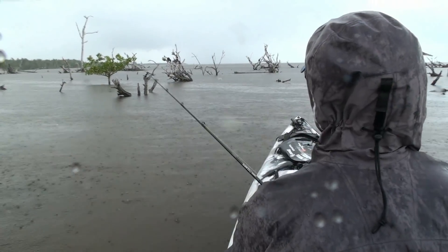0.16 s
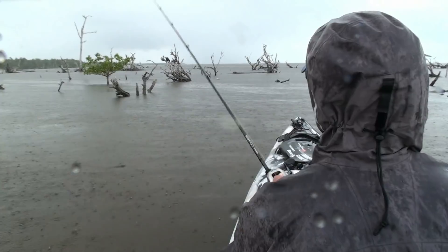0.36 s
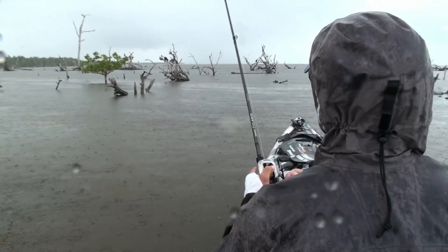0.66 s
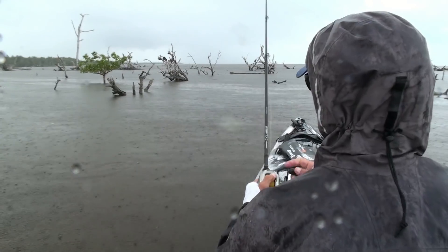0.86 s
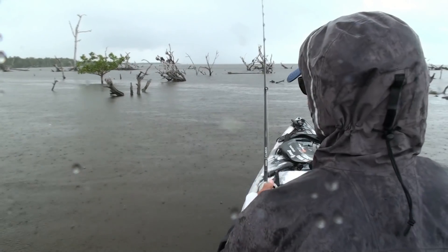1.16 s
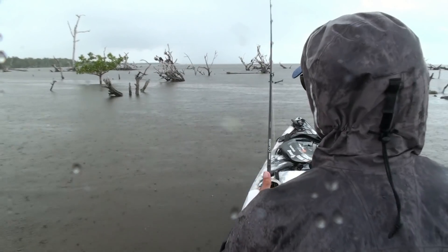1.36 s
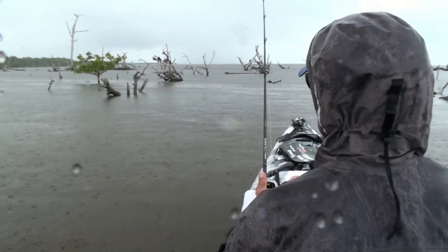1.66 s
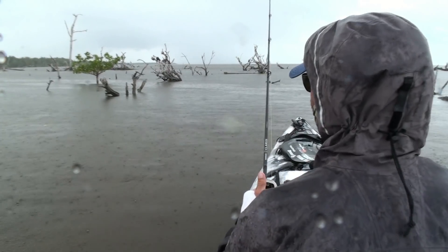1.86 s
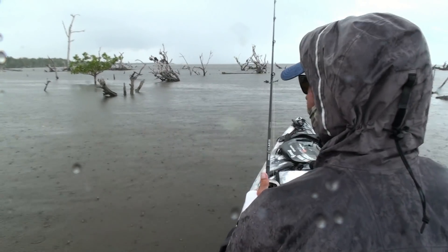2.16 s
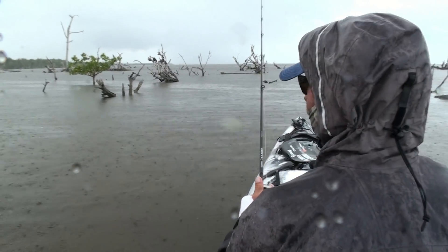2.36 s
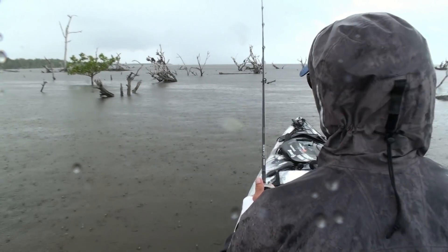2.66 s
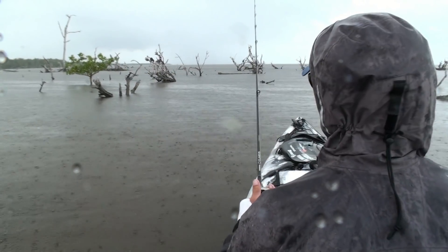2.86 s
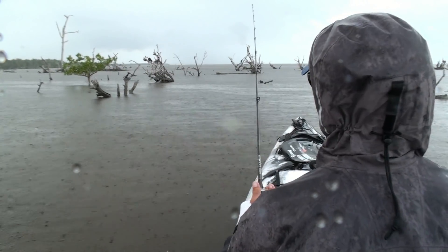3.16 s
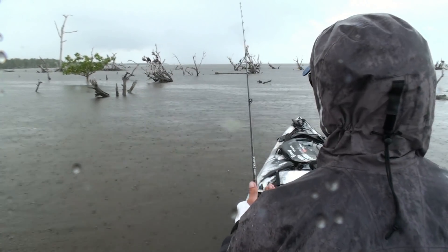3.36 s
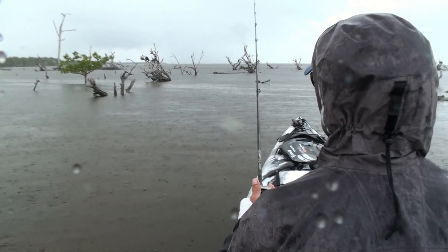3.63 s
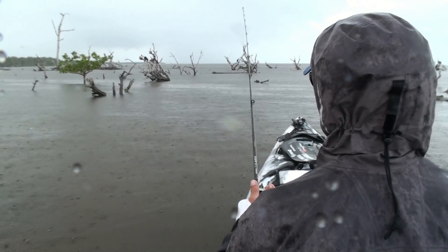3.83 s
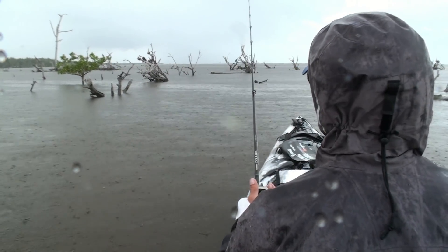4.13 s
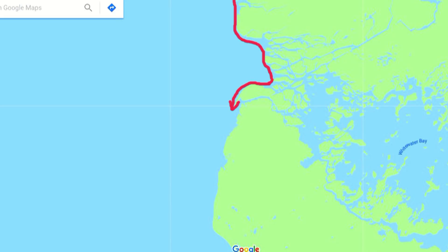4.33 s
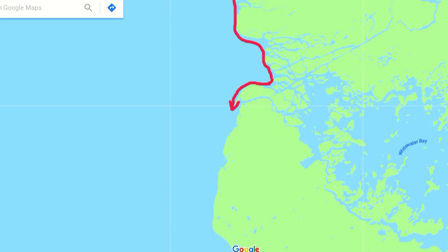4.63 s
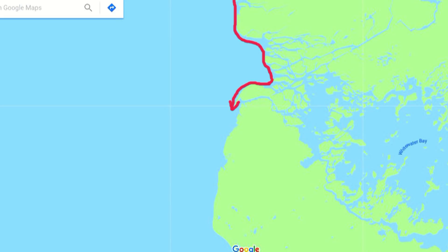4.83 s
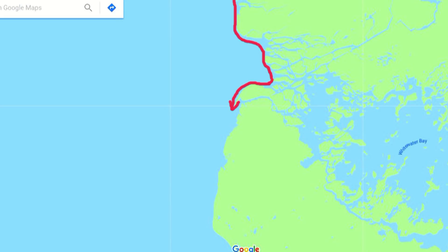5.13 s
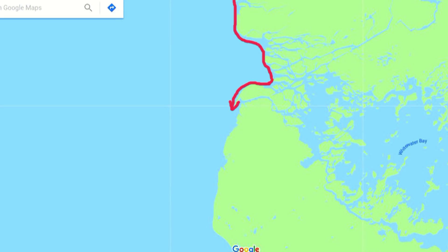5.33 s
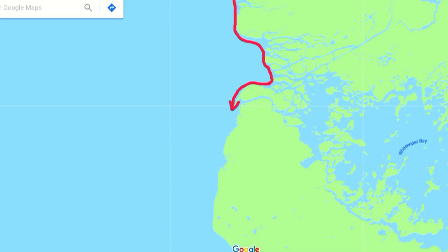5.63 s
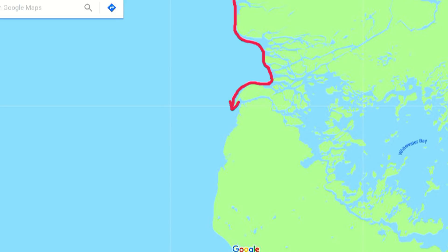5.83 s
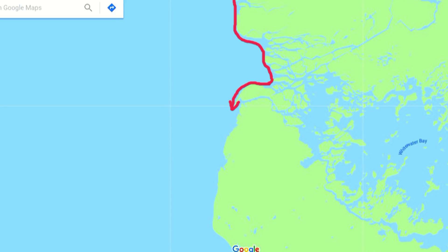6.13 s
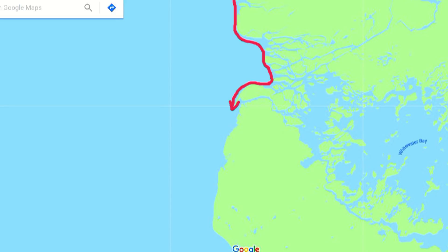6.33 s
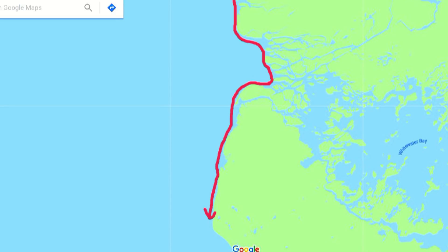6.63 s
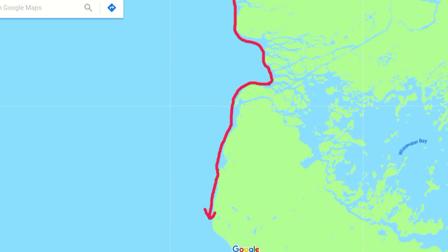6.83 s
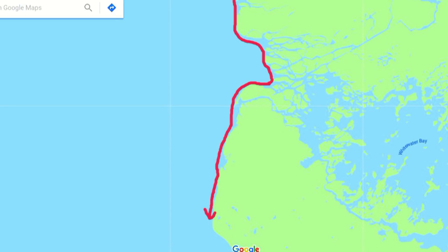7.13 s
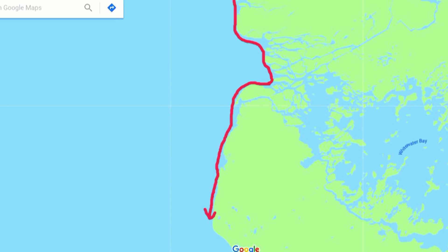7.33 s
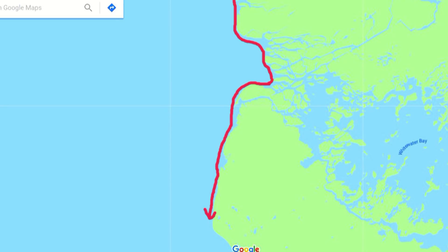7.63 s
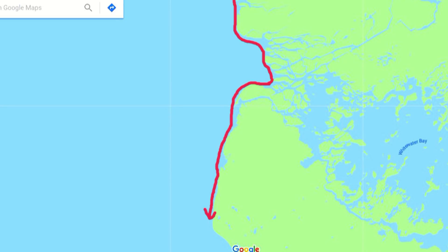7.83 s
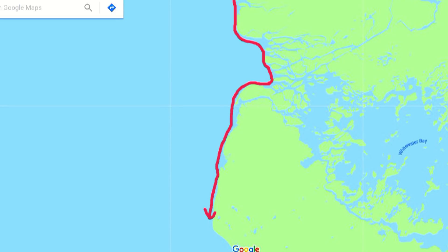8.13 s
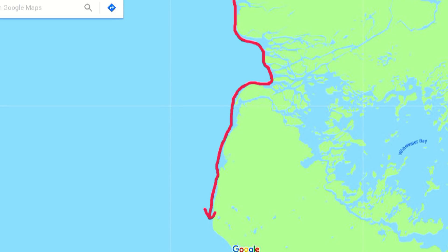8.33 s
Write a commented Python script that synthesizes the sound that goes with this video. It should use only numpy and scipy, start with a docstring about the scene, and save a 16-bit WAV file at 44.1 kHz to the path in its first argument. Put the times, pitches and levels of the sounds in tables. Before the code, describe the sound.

Steady rain hisses on open water while drops slap a waterproof hood close by; halfway through, low wind rumbles and flutters across the microphone.

```python
"""A hiss of far rain and wet slaps of near drops open the scene: rain on open water under a waterproof cover.
Near drops are noise slaps over the cover's short decaying modes; the hiss is grainy filtered noise.
Plops are rising, dying tones, hull knocks are longer modes, and a few drops spit bright noise.
Halfway, wind sets in: coloured noise swelled by gusts rumbles and flutters at two microphone ports,
and wavering tones hum over their edges."""
import sys
import numpy as np
from scipy import signal
from scipy.fft import rfft, irfft, next_fast_len
from scipy.io import wavfile
from scipy.ndimage import map_coordinates

SR = 44100
rng = np.random.default_rng(int(sys.argv[2]) if len(sys.argv) > 2 else 0)


def invert_db(x):
    """Field ratio 10**(x/20) for x, a level in decibels (scalar or array-like)."""
    u = np.asarray(x, float) / 20
    return 10 ** u


def put_to_file(sound):
    """Save the sound as 16-bit audio at rate SR, in the file named by the first command-line argument."""
    columns = np.atleast_2d(sound).T  # one column per channel
    safe = np.clip(columns, -1, 1)
    whole_steps = np.round(safe * 32767)
    wavfile.write(sys.argv[1], SR, whole_steps.astype(np.int16))


N = 373968

# rain strength over time: t/s, relative hiss level/dB, treble over its usual share/dB
RAIN_STRENGTH = [(0, -48.5, 2.5), (.9, -47.5, 2.5), (1.65, -49.5, 3), (2.45, -46.5, 1), (4, -49.5, 4),
                 (5.22, -52, 5.5), (6.3, -45, 4), (6.75, -46, 4.5), (7.65, -49, 4), (8.46, -45, 6.5)]
# colour of far rain through the cover: f/Hz, relative density/dB per Hz
HISS_COLOUR = [(25, 3.5), (64, 4.5), (427, -4), (1190, -5.5), (2350, -2.5), (2690, -9), (3340, -5),
               (4610, -15.5), (5570, -16.5), (6300, -26), (7510, -23), (9320, -39.5), (13200, -43),
               (16000, -62)]
# likeness of the two ports for rain: f/Hz, likeness/0-1
RAIN_LIKENESS = [(60, 0.03), (700, 0.76), (1500, 0.94), (3000, 0)]
# clear drops on the cover: t/s, nominal peak level/dB, strongest ring f/Hz
CLEAR_DROPS = [(0.033, -19, 2370), (0.0446, -14.5, 2370), (0.1096, -11.5, 2160), (0.1184, -10.5, 2370),
               (0.2547, -17, 3480), (0.275, -15, 2170), (0.3464, -26.5, 2440), (0.4484, -15, 2060),
               (0.458, -21, 2570), (0.471, -22, 2000), (0.5066, -23, 2160), (0.575, -24, 3250),
               (0.6197, -22, 1930), (0.7176, -21.5, 2380), (0.759, -21, 3480), (0.771, -20.5, 2300),
               (0.828, -15, 1700), (0.8546, -16.5, 2060), (0.983, -15, 2370), (1.0942, -19, 1840),
               (1.947, -20, 1990), (2.089, -20.5, 2370), (2.129, -8, 1770), (2.1645, -30.5, 2100),
               (2.203, -17.5, 2470), (2.271, -17, 2040), (2.31, -22.5, 1046), (2.4263, -21, 2070),
               (2.481, -16, 2380), (2.572, -21.5, 2020), (2.6138, -16.5, 1650), (2.657, -20, 2520),
               (2.693, -21.5, 2370), (2.8348, -17.5, 2230), (3.0066, -13.5, 2450), (3.0978, -12, 2420),
               (3.1239, -20, 1760), (3.15, -19.5, 2080), (3.2324, -6, 1590), (3.2571, -12, 2530),
               (3.39, -17.5, 1700), (3.468, -14, 2000), (3.493, -20.5, 2060), (3.5418, -21.5, 1580),
               (3.5653, -18.5, 2530), (3.6523, -16, 1710), (3.9044, -16.5, 1760), (3.982, -22, 2310),
               (4.532, -24, 1420), (4.647, -15.5, 2090), (4.74, -20.5, 1710), (4.7499, -22.5, 2270),
               (4.8681, -20.5, 1700), (5.3224, -22.5, 3430), (5.608, -23.5, 1910), (5.8303, -15.5, 2100),
               (5.988, -17, 2230), (6.042, -14.5, 3170), (6.0987, -19, 3700), (6.1354, -19, 2000),
               (6.196, -23.5, 2100), (6.2773, -12.5, 1730), (6.3415, -21, 2220), (6.455, -21, 3350),
               (6.5617, -12.5, 2230), (6.6017, -20.5, 2050), (6.6356, -15.5, 1110), (6.6636, -20, 2010),
               (6.7089, -15, 2330), (6.8704, -18, 2180), (6.894, -15.5, 3300), (7.307, -15.5, 2380),
               (7.386, -20, 2160), (7.5414, -15.5, 2030), (7.595, -21, 3100), (7.7497, -17, 2160),
               (8.094, -24, 1400), (8.431, -19, 1425)]
# flurries of small drops in a wash of running water: t/s, length/s, typical level/dB
FLURRIES = [(0.799, 0.13, -41), (4.173, 0.04, -45.5), (4.44, 0.051, -41.5), (4.515, 0.077, -41),
            (8.372, 0.071, -55.5)]
# modes of the cover, varied at each drop: typical f/Hz, level/dB, t60/s, left over right/dB
COVER_MODES = [(1110, -21, 0.035, 0), (1467, -18, 0.033, 10.5), (1710, -3.5, 0.02, 6.5),
               (2000, -2, 0.021, 6.5), (2370, -4, 0.025, 10), (3166, -3, 0.0072, 28),
               (4135, -4, 0.0092, 9.5), (5320, -3, 0.0028, -24)]
# colour of spray: f/Hz, gain/dB
SPRAY_COLOUR = [(3500, -29), (6000, 8.5), (10000, -7.5), (15800, -32), (16500, -71.5)]
# clear plops, short pitched rings after drops: t/s, nominal peak level/dB, starting f/Hz
CLEAR_PLOPS = [(1.718, -27, 800), (3.257, -17.5, 1110), (4.535, -24, 863), (4.571, -24.5, 1100),
               (5.9, -26, 750), (6.09, -22, 1300), (7.948, -25.5, 860), (7.966, -20.5, 1110)]
# drops on the hull: t/s, nominal level/dB, lowest mode over its usual share/dB
HULL_KNOCKS = [(0.364, -42, 0), (0.622, -42, 5.5), (2.905, -37.5, -5), (3.808, -38.5, -10), (4.65, -34, -4)]
# modes of the hollow hull: f/Hz, typical level/dB, t60/s
HULL_MODES = [(215.7, 0.5, 0.24), (395, -1, 0.087), (518, 11, 0.041), (784, 14.5, 0.015)]
# drops that burst into a bright spit: t/s, nominal level/dB
SPIT_BURSTS = [(0.823, -20), (1.358, -26), (2.1273, -36), (3.232, -30.5), (3.467, -26), (4.868, -43),
               (6.0423, -30.5), (6.8703, -37)]
# shove of the heaviest drop: t/s, nominal level/dB, return time/s
HEAVY_SHOVE = (3.2322, -16.5, 0.0064)
# steady air stream, setting in halfway: t/s, typical level/dB
BREEZE = [(4.19, -69), (4.225, -32), (4.55, -33), (4.62, -39.5), (4.8, -28), (5.25, -29), (5.34, -32.5),
          (5.5, -29), (6.05, -25.5), (6.8, -25), (7.65, -26), (8.0, -30), (8.2, -25.5), (8.47, -27)]
# colour of the low wind rumble: f/Hz, relative density/dB per Hz
BUFFET_COLOUR = [(12, -24), (30, 7.5), (65, 5), (130, 2.5), (200, -6), (400, -50)]
# colour of the higher wind flutter: f/Hz, relative density/dB per Hz
FLUTTER_COLOUR = [(90, -27), (200, 4), (330, -1.5), (500, -10), (800, -22), (1500, -38)]
# gusts on top of the stream: t/s, hold/s, typical level/dB, left over right/dB, flutter over buffet/dB
GUSTS = [(4.328, 0.084, -29, 14.5, -20), (4.787, 0.03, -11, 3, -19), (5.143, 0.017, -18, 6.5, -4),
         (5.448, 0.0059, -14, -13, -9.5), (5.98, 0.1, -25.5, 18.5, -12.5), (6.478, 0.2, -30.5, 25, -12.5),
         (6.737, 0.021, -16.5, 1, -3.5), (6.934, 0.029, -20.5, 14.5, -16), (7.144, 0.047, -13, 10.5, -11.5),
         (7.195, 0.063, -17, 17.5, -11), (7.287, 0.25, -14, 5, -17.5), (7.539, 0.033, -18, 7.5, -3),
         (8.05, 0.15, -20.5, 5.5, -11)]
# hums over a port's edge: t/s, length/s, nominal top f/Hz, nominal level/dB, left over right/dB
EDGE_HUMS = [(4.876, 0.68, 495.4, -38, -15), (5.68, 0.4, 522.6, -38, -14), (7.579, 0.29, 408, -32, 19)]


def unit(x):
    """Scales a sound to rms 1."""
    return x / np.sqrt(np.mean(x ** 2) + 1e-20)


def along(points, hz):
    """Reads (f/Hz, value) points on a log axis."""
    f, value = np.transpose(points)
    return np.interp(np.log(hz + 1), np.log(f + 1), value)


def curves(rows):
    """Draws each column after the time as one value per sample."""
    times, *columns = np.transpose(rows)
    return [np.interp(np.arange(N) / SR, times, column) for column in columns]


def wobble(rate):
    """Draws two smooth random curves through rate knots a second."""
    knots = rng.standard_normal((2, N // 100))
    return np.array([map_coordinates(k, [np.arange(N) * rate / SR]) for k in knots])


def filtered(x, response):
    """Multiplies the spectrum of x by a response of frequency."""
    size = next_fast_len(N + 8192)
    return irfft(rfft(x, size) * response(np.fft.rfftfreq(size, 1 / SR)), size)[..., :N]


def blend(source, spectrum, alike):
    """Colours two unrelated signals and mixes them into a stereo pair of the given likeness."""
    def response(hz):
        angle = np.arccos(np.clip(along(alike, hz), -1, 1)) / 2
        return invert_db(along(spectrum, hz)) * [np.cos(angle), np.sin(angle)]

    mid, side = filtered(source, response)
    return np.array([mid + side, mid - side])


def rush(spectrum, alike):
    """Makes plain coloured stereo noise of rms 1."""
    return unit(blend(rng.standard_normal((2, N)), spectrum, alike))


def placed(times, sounds):
    """Sums stereo sounds (events, 2, samples) at their times."""
    starts = np.round(times * SR).astype(int)
    at = (starts[:, None] + np.arange(sounds.shape[2])).ravel()
    return np.array([np.bincount(at, sounds[:, c].ravel(), N + SR)[:N] for c in (0, 1)])


def far_rain():
    """Thousands of tiny impacts blur into a hiss, grainy band by band; flurries swell it; its lows stay smooth."""
    level_db, treble_db = curves(RAIN_STRENGTH)
    start, length, db = np.transpose(FLURRIES)[..., None]
    through = np.clip((np.arange(N) / SR - start) / length, 0, 1)
    wash_power = np.sum((invert_db(db) * np.sin(np.pi * through)) ** 2, axis=0)
    swell = np.sqrt(1 + wash_power / invert_db(level_db) ** 2)
    dull, crisp = invert_db(4.24 * wobble(150))
    treble = invert_db(treble_db + 4.0 * wobble(120)) * swell
    top = invert_db(treble_db) * np.sqrt(swell)
    gains = [1, dull * swell, crisp * swell, treble, top]
    edges_hz = [0, 600, 2000, 4500, 8500, SR]
    source = sum(filtered(gain * rng.standard_normal((2, N)), lambda f: (f >= lo) * (f < hi))
                 for gain, lo, hi in zip(gains, edges_hz, edges_hz[1:]))
    hiss = blend(source, HISS_COLOUR, RAIN_LIKENESS)
    hiss = hiss / np.sqrt(np.mean((hiss / swell) ** 2))
    return invert_db(level_db + 3.5 + np.array([[1.2], [-1.2]])) * hiss


def taps(times, db, ring_hz):
    """A drop rings each mode anew, most near its own pitch, slaps broadly and throws a little spray."""
    t = np.arange(1000) / SR
    hz, mode_db, t60, pan_db = np.transpose(COVER_MODES)
    draw = rng.standard_normal((len(times), 5, len(hz)))
    # modes near the drop's own pitch are pulled to it
    near = np.exp(-(np.log(hz / ring_hz[:, None]) / 0.15) ** 2)
    pitch = hz * (1 + 0.059 * draw[:, 0]) * (1 - near) + ring_hz[:, None] * near
    level = mode_db * (1 - near) + 3 * near + 3 * draw[:, 1]
    life = t60 * np.exp(0.25 * draw[:, 2])
    start = rng.uniform(0, 2 * np.pi, life.shape)
    apart = draw[:, 3] * hz / 1700  # short waves reach the two ports out of step
    ring = []
    for side in (1, -1):
        gain = invert_db(level + side * (pan_db / 2 + 2 * draw[:, 4]))
        phase = 2 * np.pi * pitch[..., None] * t + (start + side * apart / 2)[..., None]
        decay = invert_db(-60 * t / life[..., None])
        ring.append(np.sum(gain[..., None] * decay * np.sin(phase), axis=1))
    ring = np.stack(ring, axis=1) * (1 - np.exp(-t / 0.0004))
    # the blow's strength is shared among the modes
    first = np.sqrt(np.mean(ring[..., :130] ** 2, axis=(1, 2), keepdims=True))
    ring = ring / first * invert_db(db - 5.5)[:, None, None]

    spread = 0.0022 * np.exp(0.38 * draw[:, 2, :1])  # seconds the water takes to flatten
    slap = np.exp(-(t / spread) ** 2) + invert_db(-11.5 - 60 * t / 0.044)

    def burst(size_db, shape):
        noise = rng.standard_normal(ring.shape)
        return placed(times, invert_db(size_db)[:, None, None] * shape[:, None] * noise)

    splash = filtered(burst(db + 10.0, slap),
                      lambda f: f ** 2 / (f ** 2 + 1300 ** 2) / (1 + (f / 7000) ** 2))
    splash = blend(splash, HISS_COLOUR, RAIN_LIKENESS) * invert_db([[2.5], [-2.5]])
    # higher-ringing drops throw more spray, varied at each drop
    spray_db = db - 39.0 + 8 * np.log2(ring_hz / 2200) + 6.5 * draw[:, 1, -1]
    spray = filtered(burst(spray_db, slap ** 3), lambda f: invert_db(along(SPRAY_COLOUR, f)))
    return placed(times, ring) + splash + spray


def drops():
    """Clear taps join many smaller ones by chance and flurries of water shaken loose."""
    count, shaken = 650, 14  # small drops by chance; drops in each flurry
    draw = rng.uniform(size=(count + shaken * len(FLURRIES), 3))
    start, length, flurry_db = np.repeat(FLURRIES, shaken, axis=0).T
    times = np.r_[draw[:count, 0] * N / SR, start + length * draw[count:, 0]]
    rain_db = np.interp(times[:count], *np.transpose(RAIN_STRENGTH)[:2]) + 7.5
    small_db = np.r_[rain_db, flurry_db] + np.minimum(-5.5 * np.log(draw[:, 1]), 14)
    small_hz = 900 * 4.3 ** draw[:, 2]
    return taps(times, small_db, small_hz) + taps(*np.transpose(CLEAR_DROPS))


def plops():
    """Short tones ring with rising pitch, strong ones for more cycles; faint plops thicken in flurries."""
    draw = rng.uniform(size=(380, 3))
    faint_db = -38 + np.minimum(-2.8 * np.log(draw[:, 1]), 6)
    faint = np.c_[draw[:, 0] * N / SR, faint_db, 750 * 6.5 ** draw[:, 2]]
    start, length, flurry_db = np.repeat(FLURRIES, 10, axis=0).T
    stir = rng.uniform(size=(len(start), 2))
    splatter = np.c_[start + length * stir[:, 0], flurry_db + 11, 850 * 2.4 ** stir[:, 1]]
    times, db, hz = np.transpose(np.r_[CLEAR_PLOPS, faint, splatter])[..., None]
    t = np.arange(SR // 10) / SR
    cycles = 1.6 * invert_db(db + 49) + 6  # periods of the starting pitch in a 60 dB fall
    envelope = invert_db(db - 60 * t * hz / cycles) * (1 - np.exp(-t / 0.0015))
    ring = envelope * np.sin(2 * np.pi * hz * t * (1 + 1.5 * t))
    return placed(times[:, 0], ring[:, None] * np.ones((2, 1)))


def hull():
    """Each knock rings the hollow hull's decaying modes at new strengths."""
    times, db, low_db = np.transpose(HULL_KNOCKS)
    hz, mode_db, t60 = np.transpose(HULL_MODES)[..., None]
    t = np.arange(SR // 4) / SR
    gain = invert_db(db[:, None, None] + rng.normal(0, 2, (len(times), len(hz), 1)))
    gain[:, 0, 0] *= invert_db(low_db)
    modes = invert_db(mode_db - 60 * t / t60) * np.sin(2 * np.pi * hz * t)
    ring = np.sum(gain * modes, axis=1) * (1 - np.exp(-t / 0.00095))
    return placed(times, np.stack([ring, ring], axis=1))


def spits():
    """A few drops burst near the ports into a short bright spray."""
    times, db = np.transpose(SPIT_BURSTS)
    t = np.arange(400) / SR
    noise = rng.standard_normal((len(times), 2, len(t)))
    burst = invert_db(db)[:, None, None] * np.exp(-(t / 0.0013) ** 2) * noise
    spray = filtered(placed(times, burst), lambda f: invert_db(along(SPRAY_COLOUR, f)))
    return spray * invert_db([[1.5], [-1.5]])


def thump():
    """The heaviest drop shoves the whole sheet, which sags back."""
    start, db, back = HEAVY_SHOVE
    t = np.clip(np.arange(N) / SR - start, 0, 1)
    return invert_db(db) * (1 - np.exp(-t / 0.00041)) * (1 - t / back) * np.exp(-t / back)


def wind():
    """Eddies hit each port in lumps, nearly unrelated; stream and gusts drive a low buffet and higher flutter."""
    calm = [(0, -120), (BREEZE[0][0] - 0.01, -120)]
    # the left port is the more exposed, by 2.5 dB
    stream_db = curves(calm + BREEZE)[0] + 2.5 * np.array([[0.5], [-0.5]]) + 1.3 * wobble(11)
    usual_db = np.median(BREEZE, axis=0)[1]
    flutter_db = usual_db - 7.5 + 1.71 * (stream_db - usual_db)  # swings wider than the stream
    blows, flaps = gusts()
    flaps = flaps * invert_db(3.6 * wobble(220))
    lumps = unit(invert_db(2.4 * wobble(35)))
    buffet = np.hypot(invert_db(stream_db), blows) * rush(BUFFET_COLOUR, [(60, 0.27)])
    flutter = np.hypot(invert_db(flutter_db), flaps) * invert_db(1.7 * wobble(30))
    flutter = flutter * rush(FLUTTER_COLOUR, [(300, 0.32)])
    air = lumps * (buffet + flutter) + hums()
    return filtered(air, lambda f: 1 / (1 + (f / 1800) ** 8))  # eddies carry no treble


def gusts():
    """Each gust rises fast, holds and fades, giving a gain at each port for buffet and for flutter."""
    rise_s, fade_s = 0.017, 0.037  # fade = time to fall 12 dB
    start, hold, db, pan_db, flutter_db = np.transpose(GUSTS)[..., None]
    t = np.arange(SR // 2) / SR
    fading = np.clip(t - rise_s - hold, 0, 1)
    shape = np.clip(t / rise_s, 0, 1) ** 2 * invert_db(-12 * fading / fade_s)
    power = (shape[:, None] * invert_db(db + pan_db * [0.5, -0.5])[..., None]) ** 2
    flutter_power = power * invert_db(flutter_db)[..., None] ** 2
    return [np.sqrt(placed(start[:, 0], p)) for p in (power, flutter_power)]


def hums():
    """A breathy, wavering edge tone climbs in pitch with a push of air, then sags."""
    sag, rise_s, fall_s = 0.53, 0.11, 0.12  # share of pitch lost in slower air; climb; sag after the top
    sway, swell = wobble(130)
    both = np.zeros((2, N))
    for start, length, top_hz, db, pan_db in EDGE_HUMS:
        t = np.clip(np.arange(N) / SR - start, 0, length)
        push = np.minimum(t / rise_s, np.exp(np.minimum((rise_s - t) / fall_s, 0)))
        hz = top_hz * (1 - sag * (1 - push)) * (1 + 0.0905 * sway)
        envelope = swell * np.sqrt(np.abs(np.sin(np.pi * t / length)))
        gain = invert_db(db + pan_db * np.array([[0.5], [-0.5]])) * envelope
        both += gain * np.sin(2 * np.pi * np.cumsum(hz) / SR)
    return both


def scene():
    """Sums all sources at the two ports."""
    return far_rain() + drops() + plops() + hull() + spits() + thump() + wind()


def band_limit(x):
    """A steep low-pass at the top of the band."""
    return signal.sosfilt(signal.butter(12, 16510, fs=SR, output="sos"), x)


def record(dry):
    """Rounds peaks off smoothly near full scale."""
    rounded = dry / (1 + np.abs(dry / 0.97) ** 6) ** (1 / 6)
    return band_limit(rounded)


dry = scene()
out = record(dry)
put_to_file(out)
```